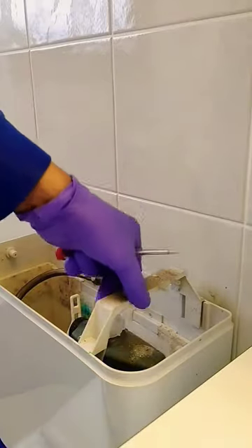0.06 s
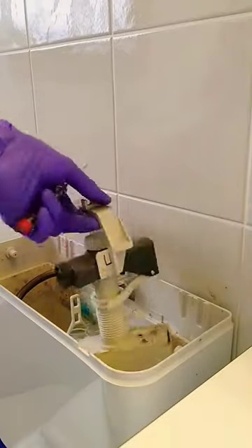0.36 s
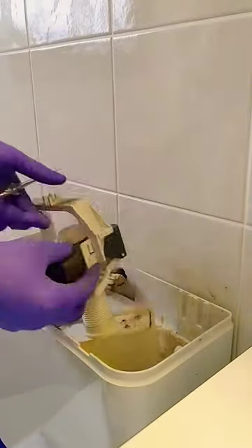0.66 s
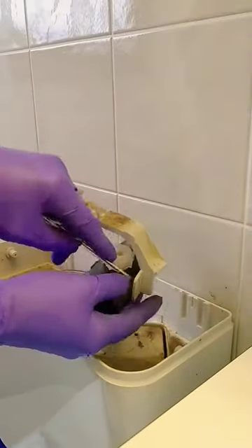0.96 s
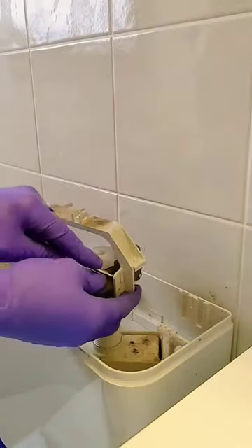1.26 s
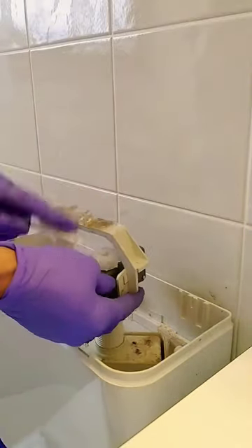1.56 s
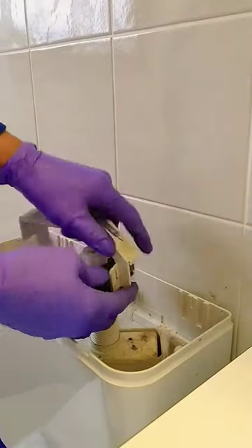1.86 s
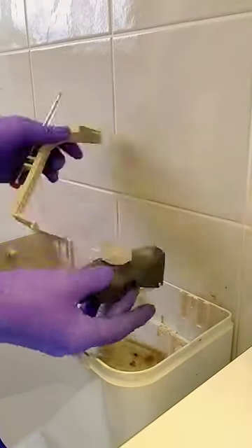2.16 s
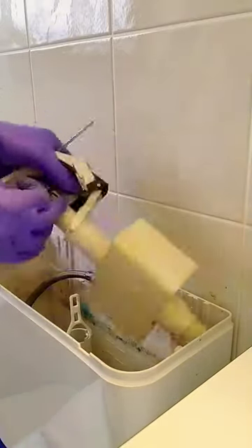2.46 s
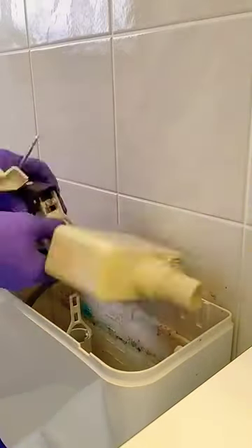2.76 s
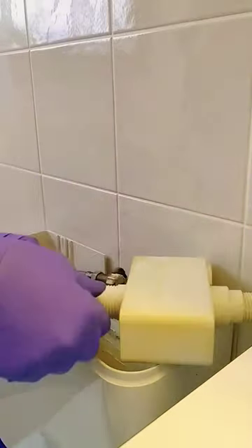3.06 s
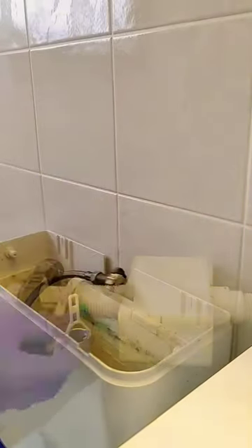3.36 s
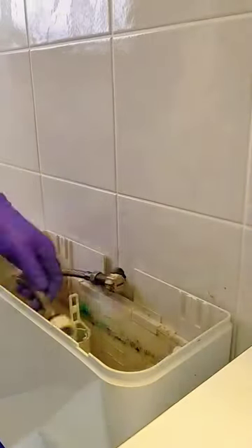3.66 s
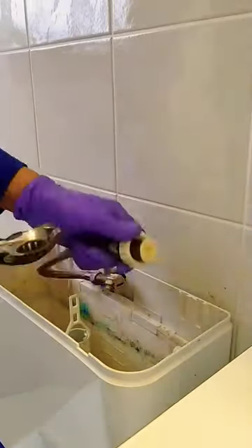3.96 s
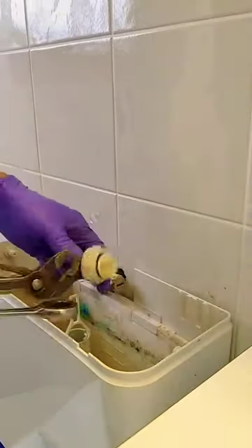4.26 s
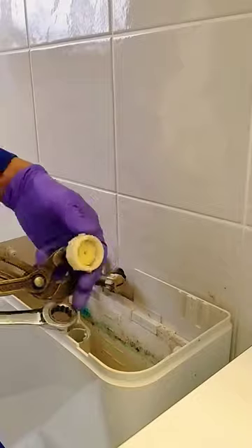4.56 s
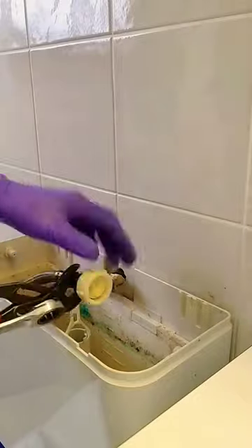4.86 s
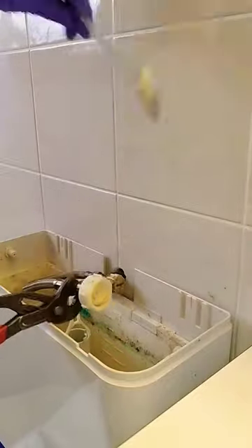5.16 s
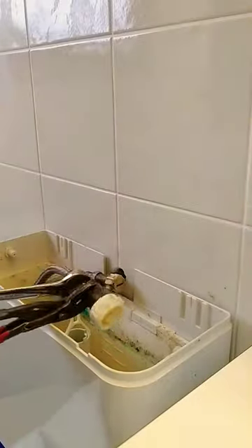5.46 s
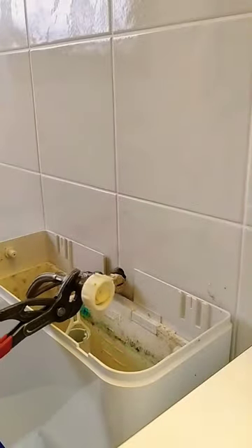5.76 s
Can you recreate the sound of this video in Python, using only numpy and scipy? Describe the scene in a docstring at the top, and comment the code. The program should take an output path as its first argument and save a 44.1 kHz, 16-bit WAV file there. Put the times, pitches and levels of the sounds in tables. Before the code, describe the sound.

Hollow knocks and plastic scraping from a toilet tank being repaired, followed by clinking pliers and a sharp snap, in a small tiled room.

```python
"""Gloved hands work a plastic float valve out of a toilet cistern in a small tiled room.
Over still room tone, plastic rubs, scrapes and clatters, and light knocks ring the hollow tank.
From 2.4 s the knocks hit harder and the tank booms. From 3.4 s steel tools skid and clink,
and pliers grip a plastic nut, with a hard snap near 4.9 s. Just after 5 s they bump down
on the rim, booming the tank again, and a few last clinks follow."""
import sys
import numpy as np
from scipy import signal
from scipy.fft import rfft, irfft
from scipy.io import wavfile
from scipy.ndimage import uniform_filter1d

SR = 44100
rng = np.random.default_rng(int(sys.argv[2]) if len(sys.argv) > 2 else 0)


def store_wav(level_fs):
    """Save 16-bit WAV to argv[1]."""
    pcm = np.round(np.clip(np.atleast_2d(level_fs), -1, 1) * 32767)
    wavfile.write(sys.argv[1], SR, pcm.T.astype(np.int16))


N = 264600
T = np.arange(int(SR * .6)) / SR  # time axis of one event [s]
APPROACH_S = .03  # light touching before a contact bites

# tone curves (frequency [Hz], gain [dB])
ROOM_TONE_EQ = [(12, 6.5), (20, 11.5), (41, 1), (96, -12), (285, -15), (410, -35.5), (499, -16), (825, -28),
                (2320, -29), (5380, -38), (9670, -38.5), (14700, -48.5), (16000, -81)]  # still air
RUB_BODY_EQ = [(50, -14), (110, 1.5), (230, 0.5), (330, -3.5), (420, -9.5), (540, -4), (850, -17),
               (1300, -17.5), (2200, -40), (5000, -50)]  # dull body of sliding plastic
RUB_HISS_EQ = [(800, -54.5), (1600, -1.5), (2500, 7), (4500, -3), (7500, -2.5), (10500, -6.5),
               (15000, -10.5)]  # its surface hiss
SKID_LOW_EQ = [(300, 9.5), (1000, 11), (2200, 20), (3500, 19), (5200, 13.5), (7500, -2.5), (12000, -23)]  # midrange bite of a hard edge
SKID_HIGH_EQ = [(2500, -23), (5500, -3.5), (7700, 23.5), (9800, 13), (12000, 10.5), (14000, 13.5),
                (16000, -10.5)]  # its top end
CLATTER_EQ = [(50, -8.5), (110, -2), (150, -2.5), (300, 0.5), (600, 3), (870, -9.5), (1250, -12),
              (2300, -17), (4000, -29.5), (9000, -52)]  # hollow chatter of a loose part
TICK_EQ = [(700, -27.5), (1600, 4), (2600, 2.5), (4500, -10.5), (7000, -7), (10500, -16), (12500, -20.5),
           (15500, -26)]  # thin tick of plastic
# decay of the tiled room (frequency [Hz], t60 [s])
ROOM_DECAY = [(100, 0.445), (500, 0.27), (2000, 0.14), (6000, 0.12), (15000, 0.039)]
# colour difference of the microphone ports (frequency [Hz], left minus right [dB])
PORT_BALANCE = [(80, 0), (200, 3.5), (330, -0.5), (550, -3), (1200, -1), (3000, -3.5), (6000, -6.5),
                (8500, 0.5), (11000, 7), (15000, -4.5)]
# plastic and gloves sliding (time [s], length [s], body level [dB], hiss level [dB])
RUB_STROKES = [(0.0, 0.12, -60.5, -67.5), (0.321, 0.13, -45, -58.5), (0.505, 0.086, -53.5, -58),
               (0.583, 0.13, -48.5, -55), (0.768, 0.14, -46, -54), (1.073, 0.15, -46.5, -58),
               (1.257, 0.086, -51.5, -61), (1.399, .18, -49, -63.5), (1.648, 0.035, -48.5, -55),
               (1.768, 0.048, -45.5, -62), (1.869, 0.11, -55.5, -84), (2.021, 0.15, -43.5, -55),
               (2.213, 0.11, -53.5, -63), (2.508, 0.12, -47, -74), (2.74, 0.11, -58.5, -77),
               (2.994, 0.25, -46, -63.5), (3.406, 0.036, -92, -49), (3.515, 0.093, -67, -69),
               (3.667, 0.1, -43, -56), (3.825, 0.11, -61.5, -61), (3.973, 0.1, -65.5, -54.5),
               (4.142, 0.027, -65, -59), (4.75, 0.03, -79, -58), (5.213, 0.13, -50.5, -64),
               (5.615, 0.11, -49.5, -73)]
# edges dragging over plastic (time [s], length [s], level [dB], resonance [Hz])
EDGE_SCRAPES = [(0.262, 0.024, -25.5, 770), (0.265, 0.011, -32, 2680), (0.486, .044, -43.5, 890),
                (0.682, 0.024, -40.5, 2840), (0.989, 0.04, -47, 1930), (1.983, 0.048, -45.5, 1850),
                (2.517, .017, -37.5, 2040), (2.546, 0.011, -34, 1550), (3.63, 0.035, -36, 1880),
                (3.631, 0.042, -36.5, 890), (3.681, 0.12, -33, 743), (3.688, 0.083, -50, 2020),
                (3.756, 0.016, -28.5, 980), (3.843, 0.022, -46, 2270), (4.575, 0.054, -42.5, 3830)]
# bright ticks, the last a hard snap (time [s], level [dB], pitch [Hz], t60 [s])
BRIGHT_TICKS = [(3.869, -29.5, 9400, 0.0048), (4.26, -38, 9050, 0.0024), (4.575, -22.5, 4900, 0.0025),
                (4.878, -28, 8500, 0.0023), (4.8954, -8.5, 8020, 0.0071)]
# the spanner being moved (time [s], level [dB])
SPANNER_CLINKS = [(3.826, -55.5), (3.885, -50.5), (3.925, -59), (3.968, -56), (4.037, -45), (4.075, -56),
                  (4.36, -43.5), (4.402, -44.5)]
# tools and small parts clicking
# (time [s], skid level [dB], brightness [dB], steel level [dB], left minus right [dB])
TOOL_CLICKS = [(0.403, -51.5, -3.5, -68, 1), (0.8976, -51.5, -7, -65, 1), (1.4817, -50, -5.5, -57, -1.5),
               (1.767, -55, -4, -69, 3.5), (3.4235, -49, 11.5, -37, -6), (3.446, -56, 10, -41, -4),
               (3.703, -42, 5.5, -40.5, 1.5), (3.7598, -41.5, -12, -54, 0.5), (3.8665, -45.5, 1, -52, -2.5),
               (3.964, -51.5, -5.5, -68, 5), (4.037, -40.5, 7, -39.5, -2.5), (4.122, -57.5, -1, -52, 0),
               (4.1704, -59.5, -1, -72, 4), (4.198, -62, -8, -74, 1), (4.2594, -52, 2, -56, 0),
               (4.336, -58, -9.5, -74, 9), (4.361, -50.5, -17.5, -67, 4), (4.4017, -51.5, -8.5, -71, 1),
               (4.5176, -54, -4, -68, 2.5), (4.5506, -49.5, -3, -57, 0.5), (4.573, -47, -14, -52, 5),
               (4.5909, -52, -6.5, -65, -11.5), (4.6247, -44.5, -1, -43, -0.5),
               (4.7241, -39.5, 3.5, -56, 0), (4.7353, -36, 0.5, -54, -4), (4.896, -34, 12, -49, -1),
               (5.542, -48, -2.5, -37.5, -4.5), (5.684, -41, -5.5, -37, -3.5), (5.742, -56, -8.5, -41, -1)]
# blows on the tank (time [s], thump level [dB], pitch [Hz], clatter level [dB], tick level [dB])
TANK_KNOCKS = [(0.261, -30, 233, -29.5, -30.5), (0.343, -55, 169, -42, -43),
               (1.032, -42.5, 267, -41.5, -48), (1.133, -39.5, 199, -36.5, -45.5),
               (1.153, -38, 288, -37.5, -41.5), (1.187, -32.5, 248, -32.5, -51),
               (1.382, -44, 261, -46.5, -47.5), (1.663, -41.5, 253, -37.5, -42.5),
               (1.992, -37.5, 220, -39.5, -52), (2.061, -36, 265, -45, -65), (2.101, -29, 215, -34, -37),
               (2.397, -37, 408, -37, -46.5), (2.472, -18, 193, -21, -51), (2.544, -18, 214, -31, -40.5),
               (2.622, -28, 550, -27.5, -58), (2.722, -48, 495, -44, -56), (2.913, -30, 506, -28.5, -36),
               (2.92, -11, 237, -28, -35.5), (3.003, -24.5, 239, -22, -43), (3.067, -36, 222, -66, -53.5),
               (3.121, -24.5, 210, -50, -50), (3.148, -22, 344, -26, -47), (3.257, -39.5, 245, -42, -70),
               (3.355, -50, 206, -52.5, -73), (3.691, -33.5, 500, -43, -62),
               (3.752, -29.5, 296, -35.5, -32), (5.096, -21.5, 553, -28, -54),
               (5.105, -19.5, 264, -25.5, -45.5), (5.236, -20, 278, -21.5, -41),
               (5.242, -13.5, 317, -27.5, -44), (5.312, -25, 305, -46, -66), (5.489, -29, 304, -48, -63),
               (5.678, -36.5, 198, -36, -34), (5.707, -30, 281, -41.5, -53)]
# blows that shake the whole tank (time [s], level [dB])
TANK_BOOMS = [(2.476, -32), (2.627, -33), (2.935, -39), (3.259, -46.5), (5.104, -26.5), (5.241, -26.5),
              (5.312, -22), (5.676, -34)]
# ringing modes (frequency [Hz], level [dB], free t60 [s])
SPANNER_MODES = [(3207, 1, 0.041), (3330, -9, 0.09), (5000, -21, 0.099), (8600, -21, 0.099)]  # spanner
PLIER_MODES = [(2187, -2, 0.06), (3964, -4.5, 0.09), (6050, -1, 0.038), (6340, 4, 0.05), (7570, -26.5, .09),
               (7720, -12, 0.016), (8560, -7, 0.06), (9690, -8.5, 0.064), (13400, -17.5, .07)]  # steel jaws
WALL_MODES = [(111.6, 0.5, 0.47), (178.1, 4, 0.31), (232.3, 5, 0.25), (278.2, 7, 0.22), (316.7, -9.5, 0.45),
              (350.4, -11, 0.32), (433, -14.5, 0.11), (470, -2, 0.24), (522, 3.5, 0.16), (601, 1.5, 0.071),
              (609, 3, 0.083), (663, -28, 0.39), (810, -1, 0.14), (857, -42, 0.39), (1090, -34.5, .12)]  # hollow tank walls


def amp(db):
    """Decibels to gain."""
    return 10 ** (np.asarray(db) / 20)


def unit(x):
    """Scales to rms 1."""
    return x / np.sqrt(np.mean(x ** 2) + 1e-20)


def crest(x):
    """Scales the loudest 10 ms to rms 1."""
    return x / np.sqrt(uniform_filter1d(x ** 2, size=441, mode="constant").max() + 1e-20)


def read(curve, hz):
    """Reads a curve along a log-frequency axis."""
    f, value = np.transpose(curve)
    return np.interp(np.log(hz + 1), np.log(f + 1), value)


def add(mix, s, sound):
    """Mixes a sound in at time s."""
    part = mix[max(round(s * SR), 0):][:len(sound)]
    part += sound[:len(part)]


def colour(x, curve):
    """Minimum-phase EQ along a tone curve."""
    log_gain = np.log(amp(read(curve, abs(np.fft.fftfreq(4096, 1 / SR)))))
    taps = np.fft.ifft(np.exp(np.conj(signal.hilbert(log_gain)))).real
    return signal.oaconvolve(x, taps[:len(taps) // 2])[:len(x)]


def swell(rise, t60):
    """Linear attack, then exponential decay; both in seconds."""
    return np.minimum(T / rise, 1) * 1000 ** (-np.maximum(T - rise, 0) / t60)


def grains(count, per_s, spread_db):
    """Tiny slips of uneven size at random moments."""
    size = amp(spread_db * np.minimum(rng.exponential(1, count), 4))
    return size * rng.standard_normal(count) * (rng.random(count) < per_s / SR)


def contact(rise, t60, spread_db):
    """Slips grow as two parts meet, peak one rise after they bite, and die away."""
    past_peak = T - APPROACH_S - rise
    envelope = np.exp(np.minimum(past_peak / rise * 0.79, -past_peak / t60 * np.log(1000)))
    return grains(len(T), per_s=7000, spread_db=spread_db) * envelope


def near(modes, hz, octaves):
    """The place of a blow favours the modes around one pitch."""
    return 1 / (1 + (np.log2(np.transpose(modes)[0] / hz) / octaves) ** 2)


def ring(modes, weights=1, t60_scale=1, detune=.005):
    """Dying modes, each slightly detuned at random."""
    hz, db, t60 = np.transpose(modes)
    hz = hz * (1 + detune * rng.standard_normal(len(hz)))
    sign = (-1) ** np.arange(len(hz))
    decay = 1000 ** (-T / (t60_scale * t60[:, None]))
    return (sign * amp(db) * weights) @ (np.sin(2 * np.pi * hz[:, None] * T) * decay)


def room_tone(level_db=-51.5):
    """A bed of still room noise, partly shared by both channels."""
    shared, left, right = (colour(rng.standard_normal(N), ROOM_TONE_EQ) for _ in range(3))
    return amp(level_db) * unit(shared + np.array([left, right]))


def reflections(early_db=-2, tail_db=-15, low_cut_hz=260):
    """Close tiles answer at once; a faint tail follows, different on each side."""
    taps = rng.choice([-1., 1.], (2, len(T))) * (rng.random((2, len(T))) < 4000 / SR) * (T > .001)
    early = taps * swell(rise=0.001, t60=0.039)
    hz, t, spectrum = signal.stft(taps, SR, nperseg=256)
    decay = 1000 ** (-t / read(ROOM_DECAY, hz)[:, None])
    tail = signal.istft(spectrum * decay, SR, nperseg=256)[1][:, :len(T)]
    response = amp(early_db) * unit(early) + amp(tail_db) * unit(tail)
    low_cut = signal.butter(2, low_cut_hz, "high", fs=SR, output="sos")
    return signal.sosfilt(low_cut, response) / np.sqrt(len(T))


def tiled_room(x, patterns=5, patterns_per_s=23):
    """The hands keep moving, so the sound crossfades from one reflection pattern to the next."""
    place = np.arange(N) / SR * patterns_per_s
    out = np.zeros((2, N))
    for k in range(patterns):
        away = abs((place - k + patterns / 2) % patterns - patterns / 2)
        send = np.cos(np.pi / 2 * np.minimum(away, 1))
        out += signal.oaconvolve(x * send, reflections(), axes=1)[:, :N]
    return out


def rubbing(attack_s=.025, release_t60=0.22, catch_db=2.5):
    """Sliding plastic catches and slips: clumps of grains with a dull body and a hiss on top."""
    body, hiss = np.zeros((2, N))
    for s, length, body_db, hiss_db in RUB_STROKES:
        slide = np.minimum(T / attack_s, 1) * 1000 ** (-np.maximum(T - length, 0) / release_t60)
        add(body, s, amp(body_db + 1) * slide)
        add(hiss, s, amp(hiss_db) * slide)
    catches = unit(uniform_filter1d(uniform_filter1d(rng.standard_normal(N), size=600), size=300))
    slips = grains(N, per_s=2500, spread_db=3.5) * amp(catch_db * np.minimum(catches, 2))
    return body * unit(colour(slips, RUB_BODY_EQ)) + hiss * unit(colour(slips, RUB_HISS_EQ))


def scrapes(q=2.24, grit_db=-9):
    """An edge drags over plastic: a run of gritty slips rings one broad resonance."""
    out = np.zeros(N)
    for s, length, db, hz in EDGE_SCRAPES:
        stroke = np.sin(np.pi * np.sqrt(np.minimum(T / length, 1)))
        slips = grains(len(T), per_s=3000, spread_db=0.5) * stroke
        resonance = np.exp(-np.pi * hz / q * T) * np.sin(2 * np.pi * hz * T)
        body = crest(signal.fftconvolve(slips, resonance)[:len(T)])
        grit = amp(grit_db) * crest(colour(slips, TICK_EQ))
        add(out, s, amp(db - 1) * (body + grit))
    return out


def bright_ticks():
    """High pings a few milliseconds long; a faint one comes just before the hard snap."""
    out = np.zeros(N)
    for s, db, hz, t60 in BRIGHT_TICKS:
        add(out, s, ring([(hz, db, t60)]))
    return out


def spanner(attack_s=0.00076):
    """The spanner rings lightly as it is moved."""
    out = np.zeros(N)
    for s, db in SPANNER_CLINKS:
        clink = ring(SPANNER_MODES, detune=0.0071) * np.minimum(T / attack_s, 1)
        add(out, s, amp(db) * crest(clink))
    return out


def tool_clicks(attack_s=0.0025, skid_trim_db=-2, steel_trim_db=-4):
    """Hard edges skid and snap over each other and set the steel pliers ringing."""
    out = np.zeros((2, N))
    for s, skid_db, bright_db, steel_db, pan_db in TOOL_CLICKS:
        t60 = 0.069 * 2 ** ((-48 - skid_db) / 20)  # a firmer click is over sooner
        skid = contact(attack_s, t60, spread_db=2)
        low = amp(-bright_db / 2) * crest(colour(skid, SKID_LOW_EQ))
        high = amp(bright_db / 2) * crest(colour(skid, SKID_HIGH_EQ))
        click = amp(skid_db + skid_trim_db) * (low + high)
        spot = rng.uniform(.3, 1, len(PLIER_MODES))  # each spot on the jaws has its own mode mix
        hz = 6200 * 2 ** (bright_db / 20)  # a brighter click rings higher modes
        steel = ring(PLIER_MODES, spot * near(PLIER_MODES, hz, octaves=.5), detune=.012)
        steel *= np.minimum(T / attack_s, 1)
        add(click, APPROACH_S, amp(steel_db + steel_trim_db) * crest(steel))
        add(out[0], s - APPROACH_S, amp(pan_db / 2) * click)
        add(out[1], s - APPROACH_S, amp(-pan_db / 2) * click)
    return out


def tank_booms(hz=77.7):
    """Heavy blows shake the whole tank on its fixings."""
    out = np.zeros(N)
    for s, db in TANK_BOOMS:
        add(out, s, amp(db) * np.sin(2 * np.pi * hz * T) * swell(rise=0.0041, t60=0.37))
    return out


def tank_knocks(attack_cycles=0.84, rebound_s=.0172, bite_s=0.0036, chatter_t60=0.077):
    """Each blow rings the hand-damped walls near its pitch, while the loose part chatters on them."""
    thumps, clatter = np.zeros((2, N))
    for s, thump_db, hz, clatter_db, tick_db in TANK_KNOCKS:
        walls = ring(WALL_MODES, near(WALL_MODES, hz, octaves=0.42), t60_scale=0.66, detune=0.016)
        walls *= np.minimum(T * hz / attack_cycles, 1)
        add(walls, rebound_s * rng.uniform(.85, 1.15), amp(-9.5) * walls)  # softer second landing
        add(thumps, s, amp(thump_db) * crest(walls))
        chatter = contact(bite_s, chatter_t60, spread_db=1.5)
        add(chatter, rebound_s, amp(-14.5) * contact(bite_s, chatter_t60, spread_db=3.5))
        add(clatter, s - APPROACH_S, amp(clatter_db - 2) * crest(colour(chatter, CLATTER_EQ)))
        add(clatter, s - APPROACH_S, amp(tick_db - 2) * crest(colour(chatter, TICK_EQ)))
    return thumps, clatter


def scene(tank_send_db=-11, parts_direct_db=-2, right_delay_s=0.000201):
    """Direct sound and tiled room reach two microphone ports, each with its own colour."""
    thumps, clatter = tank_knocks()
    tank = thumps + tank_booms()
    parts = clatter + scrapes() + bright_ticks() + rubbing() + tool_clicks() + spanner()
    reverb = tiled_room(parts + amp(tank_send_db) * tank)
    mix = tank + amp(parts_direct_db) * parts + reverb
    hz = np.fft.rfftfreq(N, 1 / SR)
    lean = amp(read(PORT_BALANCE, hz) / 2)
    ports = np.array([lean, np.exp(-2j * np.pi * hz * right_delay_s) / lean])
    return irfft(rfft(mix) * ports, N) + room_tone()


def record(dry, cutoff_hz=15800):
    """A steep low-pass trims the very top."""
    low_pass = signal.firwin(401, cutoff_hz, window=("kaiser", 9), fs=SR)
    return signal.oaconvolve(dry, low_pass[None], "same")


dry = scene()
out = record(dry)
store_wav(out)
```